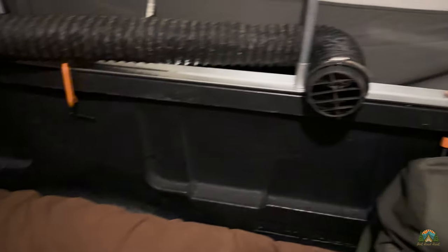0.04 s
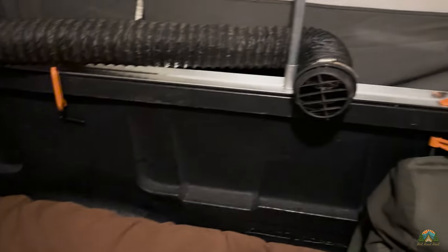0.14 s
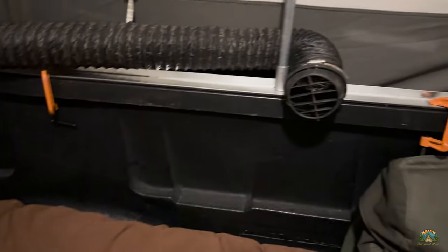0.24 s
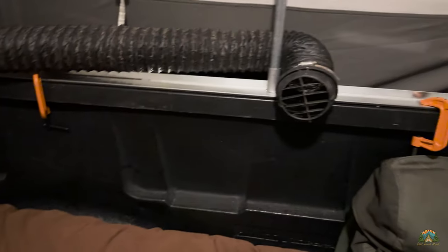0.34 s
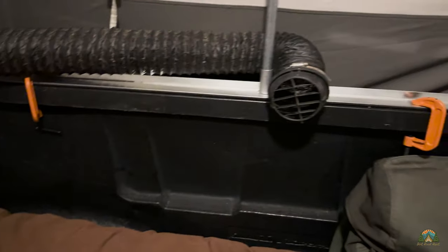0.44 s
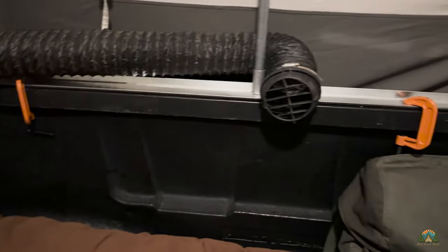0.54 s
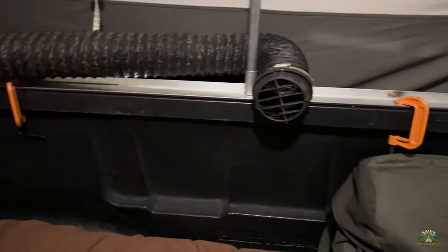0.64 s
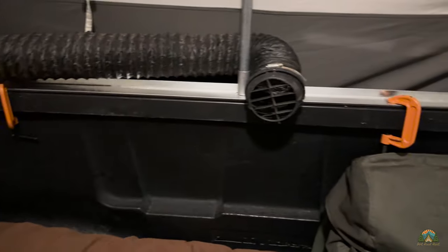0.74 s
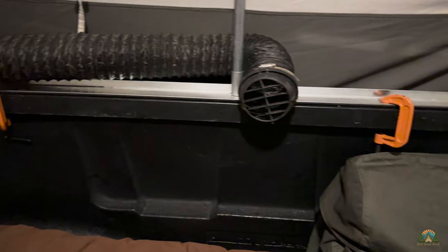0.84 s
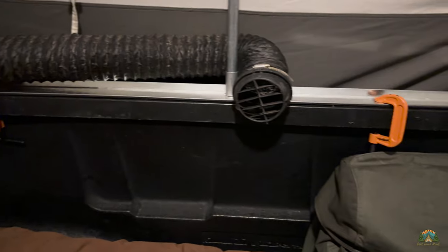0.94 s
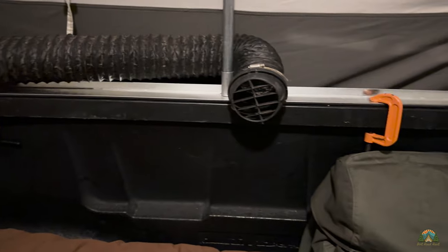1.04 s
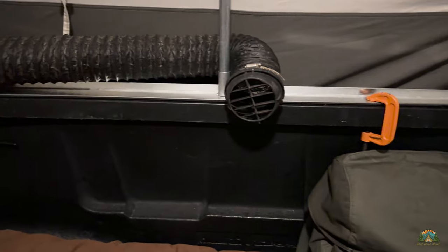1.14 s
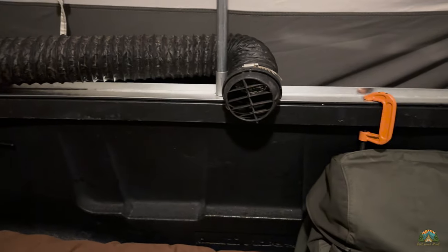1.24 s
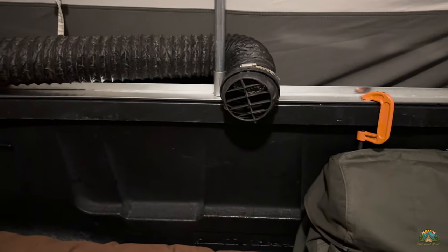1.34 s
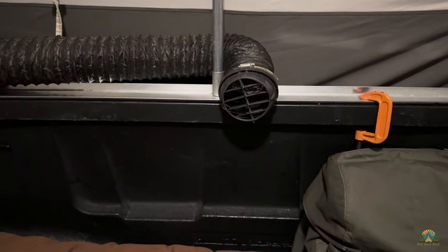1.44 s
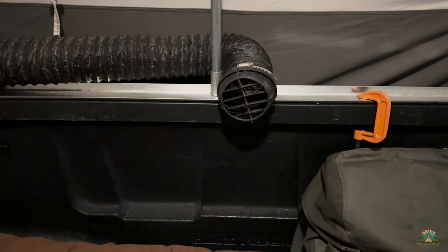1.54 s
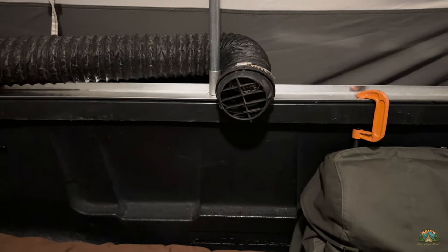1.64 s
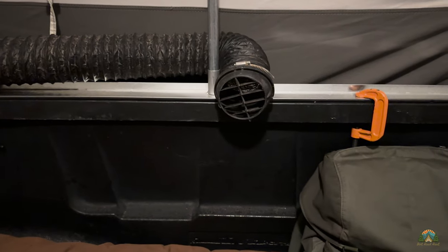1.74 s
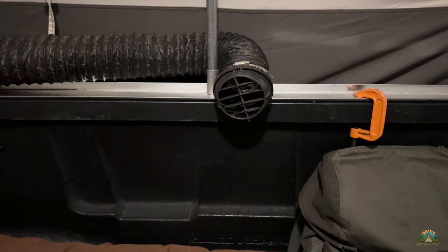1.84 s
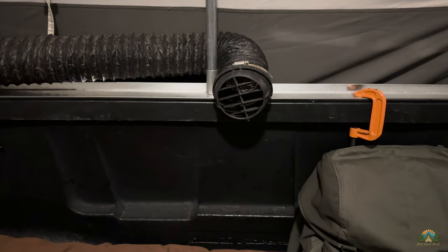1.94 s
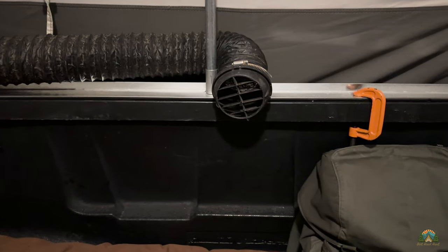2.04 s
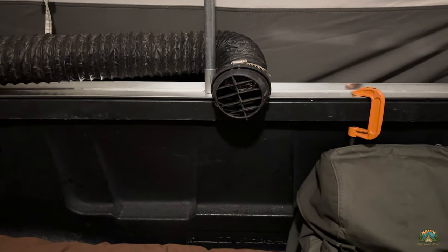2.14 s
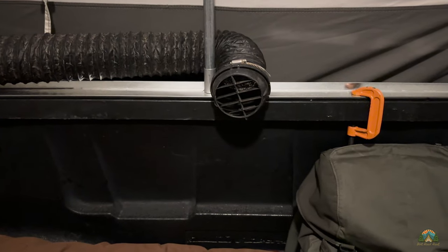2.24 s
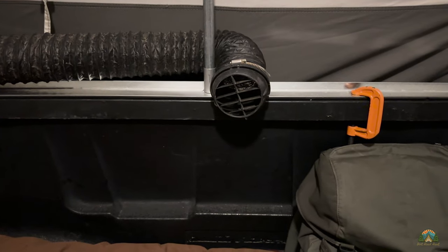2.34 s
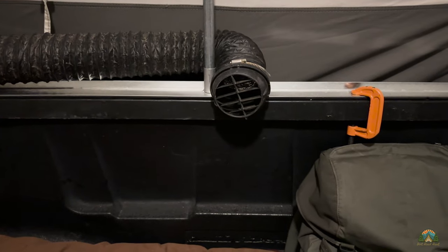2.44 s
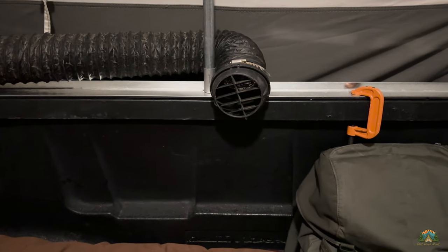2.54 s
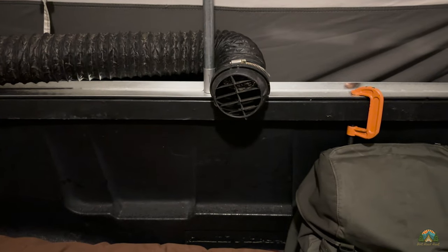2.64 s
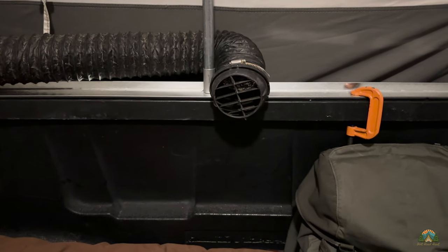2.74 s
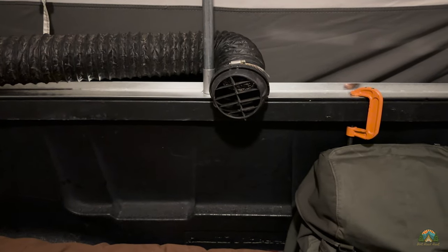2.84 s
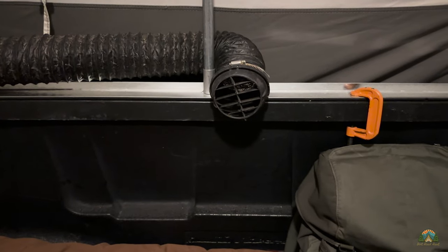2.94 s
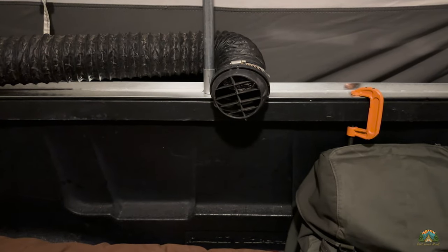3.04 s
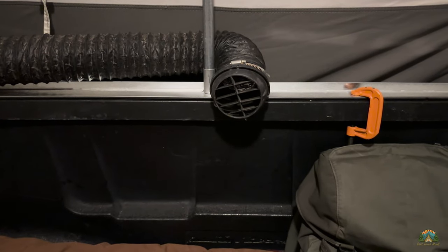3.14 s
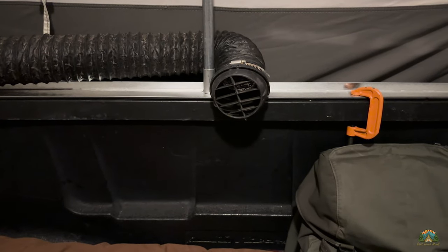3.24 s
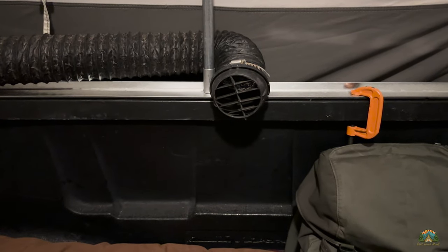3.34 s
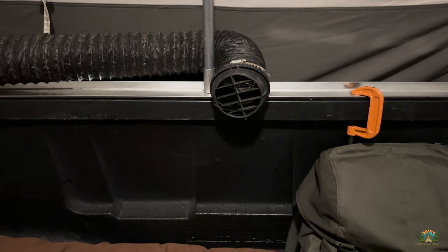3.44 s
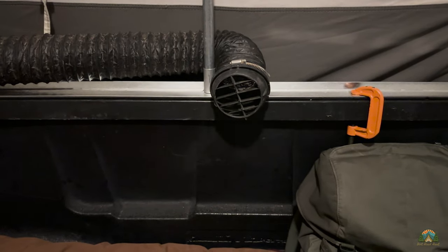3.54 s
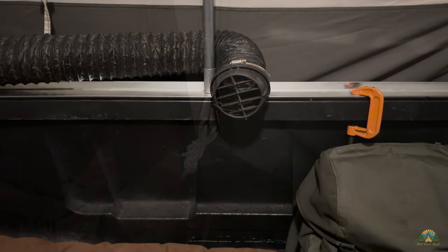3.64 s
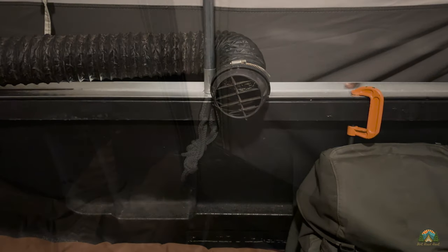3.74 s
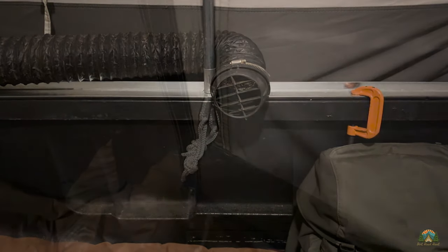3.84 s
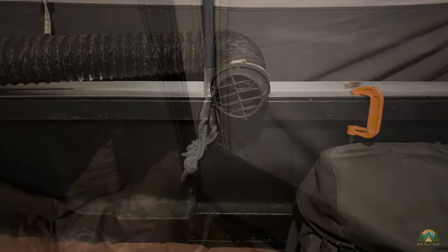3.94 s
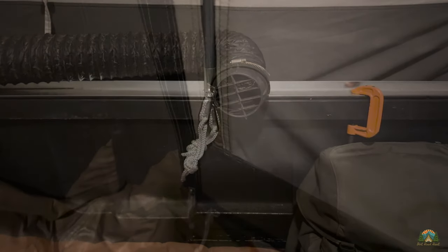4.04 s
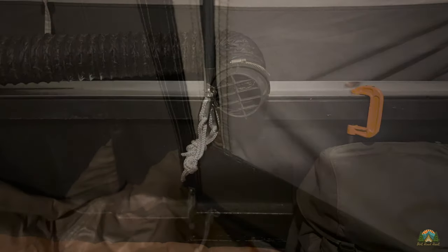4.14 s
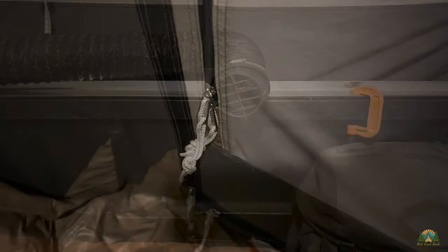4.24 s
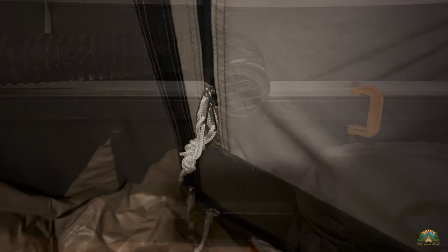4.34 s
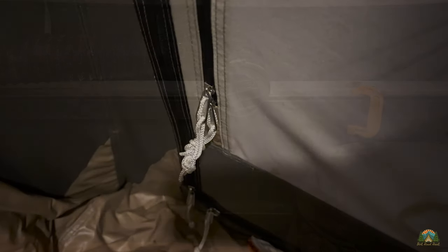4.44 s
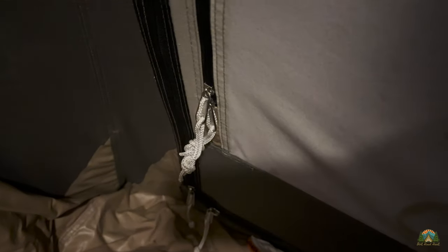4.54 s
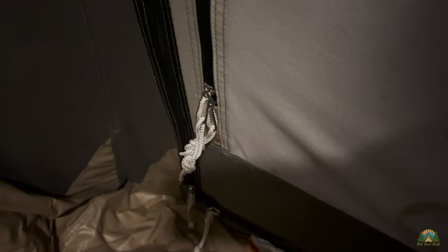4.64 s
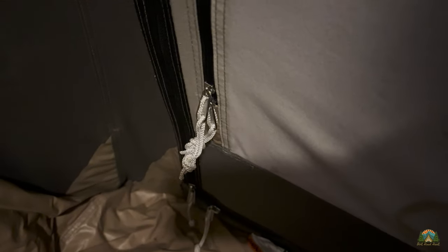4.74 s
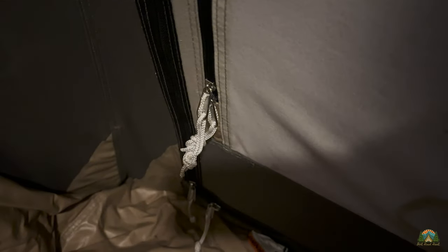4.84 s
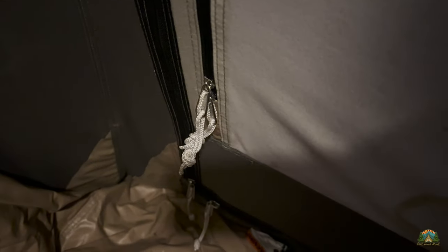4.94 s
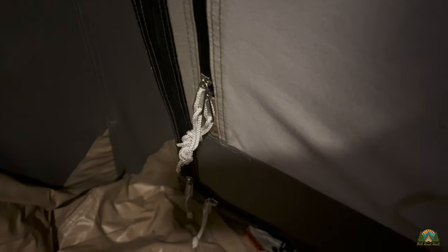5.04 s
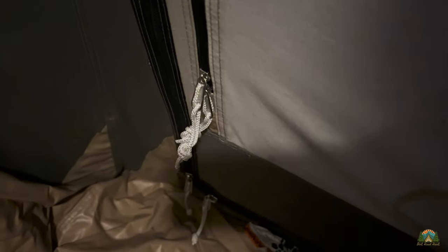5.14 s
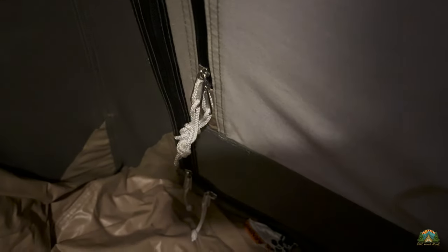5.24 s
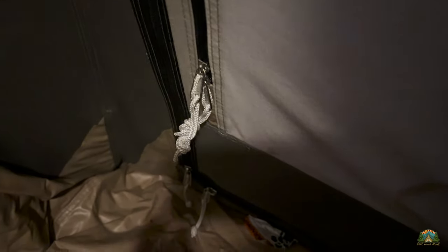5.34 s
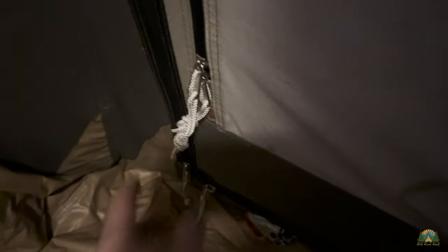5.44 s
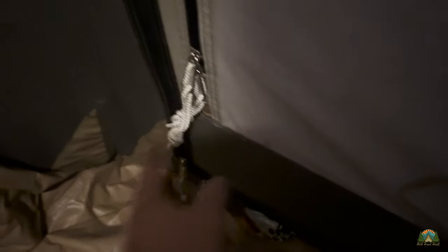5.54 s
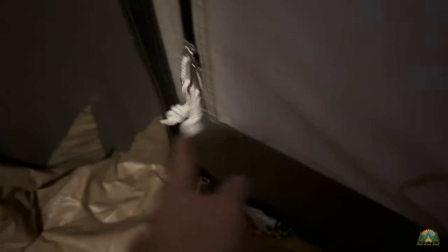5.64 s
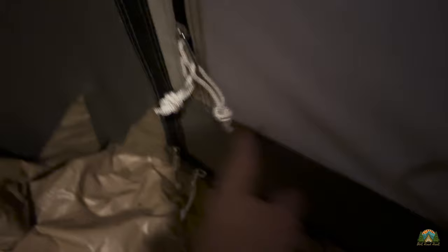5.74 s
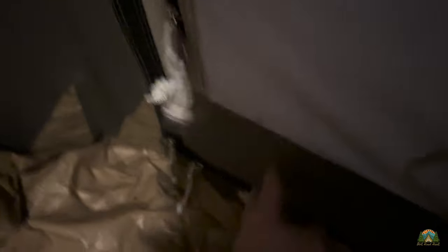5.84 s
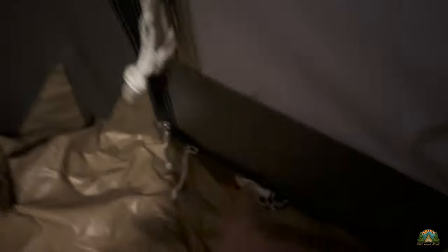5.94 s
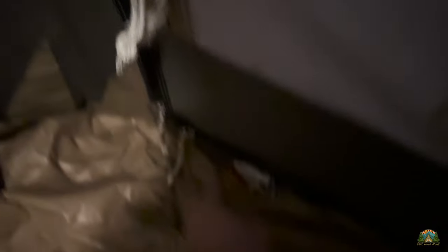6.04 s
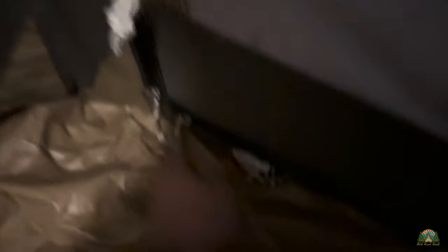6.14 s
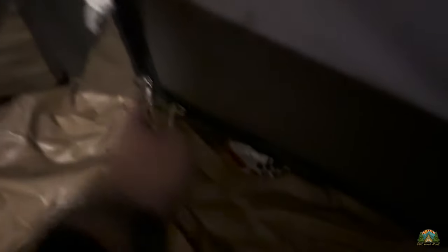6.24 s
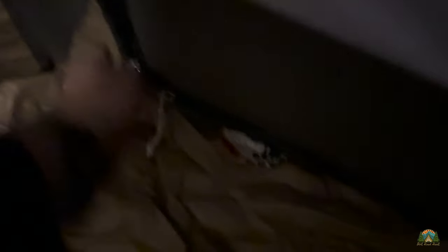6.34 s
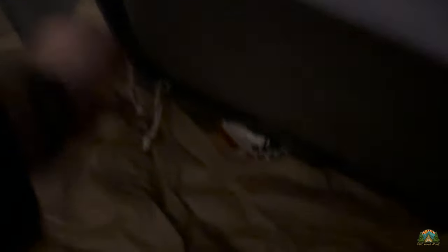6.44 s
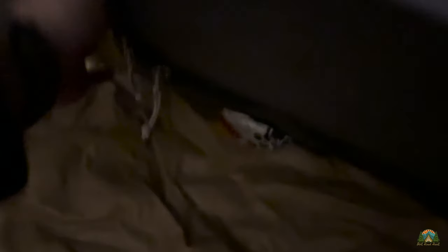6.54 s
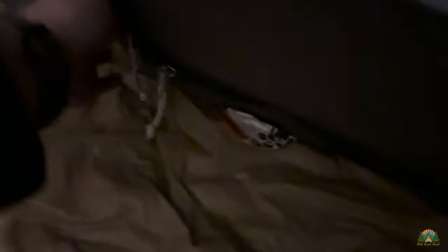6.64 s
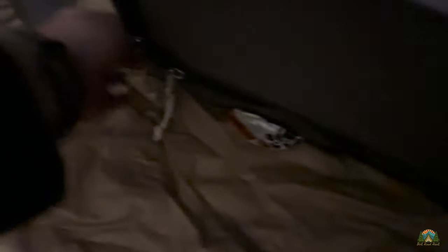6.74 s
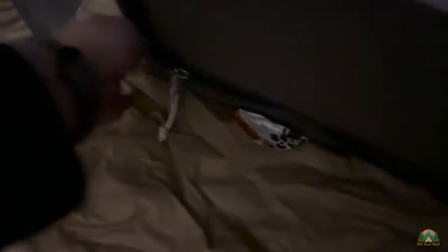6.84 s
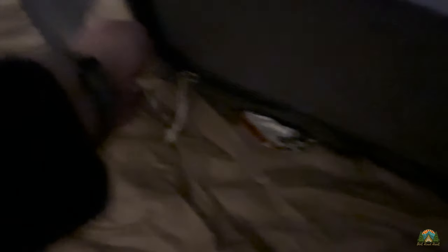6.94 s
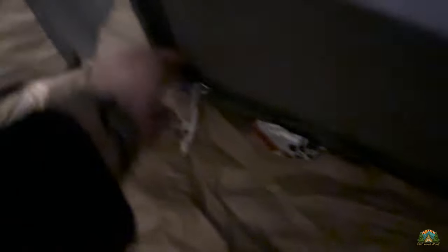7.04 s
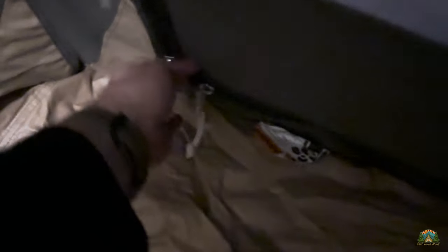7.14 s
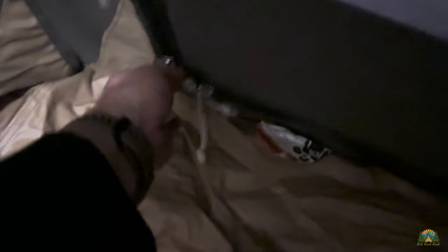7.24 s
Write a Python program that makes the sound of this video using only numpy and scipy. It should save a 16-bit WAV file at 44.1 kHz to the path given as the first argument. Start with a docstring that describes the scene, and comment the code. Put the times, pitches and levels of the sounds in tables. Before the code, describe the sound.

A fuel heater rumbles and whines through its duct in a canvas tent, pump knocking; then fabric rustles and metal zipper pulls rattle and clink.

```python
"""A fuel heater rumbles through its duct inside a canvas tent: flame and air are shaped noise, the fan whines
in narrow noise bands, and the pump knocks as damped tones. Light creaks are short bursts of tiny slips.
At about four seconds the place changes abruptly to the door, where rumble and whine are louder.
A sleeve swishes on the canvas, folds crinkle, and metal pulls rattle and clink, all from noise bursts and rings,
as the zipper starts over its first teeth."""
import sys
import numpy as np
from scipy import signal
from scipy.fft import rfft, irfft, next_fast_len
from scipy.io import wavfile
from scipy.ndimage import uniform_filter1d, map_coordinates

SR = 44100
rng = np.random.default_rng(int(sys.argv[2]) if len(sys.argv) > 2 else 0)


def dump_mix(stems):
    """Bounce the given channels to the path in sys.argv[1] as a 16-bit WAV at rate SR."""
    frames = np.atleast_2d(stems).T  # one column per channel
    limited = np.clip(frames, -1, 1)  # hard clip at full scale
    pcm = np.round(limited * 32767).astype(np.int16)
    wavfile.write(sys.argv[1], SR, pcm)


N = 321048
TOP_HZ = 16000  # upper limit of the sound


def amp(db):
    """Turn decibels into gain."""
    return 10 ** (np.asarray(db) / 20)


def unit(x):
    """Scale a sound to rms 1."""
    return x / np.sqrt(np.mean(x ** 2) + 1e-20)


def along(points, hz):
    """Read a (Hz, value) table on a log frequency axis."""
    f, v = np.transpose(points)
    return np.interp(np.log(hz + 1), np.log(f + 1), v)


def wobble(rate):
    """Draw a smooth random curve with this many knots a second."""
    knots = rng.standard_normal(int(N * rate / SR) + 4)
    return map_coordinates(knots, [np.arange(N) * rate / SR])


def filtered(x, response):
    """Shape a sound by a response, given as a function of frequency."""
    n = x.shape[-1]
    m = next_fast_len(n + 8192)  # spare room for the filter's tail
    return irfft(rfft(x, m) * response(np.fft.rfftfreq(m, 1 / SR)), m)[..., :n]


def colour(points):
    """Make a response from a (Hz, dB) table."""
    return lambda hz: amp(along(points, hz))


def spread(pair, response, alike):
    """Turn two unrelated signals into a coloured left and right of a given likeness."""
    def mid_side(hz):
        turn = np.arccos(np.clip(along(alike, hz), -1, 1)) / 2
        return response(hz) * np.array([np.cos(turn), np.sin(turn)])

    mid, side = filtered(pair, mid_side)
    return np.array([mid + side, mid - side])


def rush(response, alike):
    """Make steady coloured stereo noise of rms 1."""
    return unit(spread(rng.standard_normal((2, N)), response, alike))


def add(track, s, sound):
    """Mix a sound into the track at time s."""
    start = int(np.clip(round(s * SR), 0, N - 1))
    track[..., start:start + sound.shape[-1]] += sound[..., :N - start]


def ring(modes, t, scatter_db):
    """Ring damped tones (Hz, dB, t60 s), each struck at a random strength and phase."""
    total = 0
    for hz, db, t60 in modes:
        fade = amp(db + scatter_db * rng.normal() - 60 * t / t60)
        total = total + fade * np.sin(2 * np.pi * (hz * t + rng.random()))
    return total


def burst(t, rise, t60, rough_db):
    """Make a dying cluster of tiny slips, as two unrelated noise signals."""
    slips = amp(rough_db * unit(uniform_filter1d(rng.standard_normal(len(t)), size=40)))
    noise = unit(rng.standard_normal((2, len(t))) * slips)
    return noise * (1 - np.exp(-t / rise)) * amp(-60 * t / t60)


def resonance(f, centre, width):
    """The response of one resonance, 1 at its centre."""
    return 1j * f * width / (centre * centre - f * f + 1j * f * width)


# left-right likeness of the heater and frame: f/Hz, likeness [-1..1]
ALIKE_HEATER = [(60, 1), (130, 0.98), (200, 0.96), (290, 0.99), (500, 0.78), (800, 0.32), (1300, 0),
                (2100, 0.48), (5000, 0), (15000, .2)]


def whine(lines):
    """The fan's narrow bands of noise, each with its own total level."""
    def height(hz):
        power = 0
        for centre, width, db in lines:
            power = power + amp(db) ** 2 / width / (1 + ((hz - centre) / width * 2) ** 2) ** 2.1
        return np.sqrt(power)

    return rush(height, ALIKE_HEATER)


DOOR_S = 4.064  # when the place changes to the door
SURGE_PER_S, SURGE_DB = 10.2, 1.7  # by the door the flame pulses unevenly, about this fast and strongly
WHINE_FADE_S, WHINE_FADE_DB_PER_S = 5.1, 4  # the whine at the door recedes from this time on
# burner rumble by the duct and by the door: f/Hz, level/dB [per Hz, relative]
RUMBLE_DUCT = [(25, -39.5), (42, -13), (62, -2.5), (85, -12.5), (116, 2.5), (165, -10), (200, -1),
               (260, -14.5), (370, -14), (440, -22.5), (560, -22), (700, -38.5), (1000, -42.5), (1500, -88)]
RUMBLE_DOOR = [(25, -51), (42, -13), (60, -6), (82, -4), (112, 3), (148, -3.5), (175, 1.5), (255, -5),
               (330, -11.5), (480, -16), (700, -35), (1000, -65.5), (1500, -100)]
# rushing air in the duct: f/Hz, level/dB [per Hz, relative]
AIR = [(300, -2), (800, 4), (1250, 5.5), (1700, -10), (2200, -5.5), (2900, -12.5), (4200, -20), (7500, -20),
       (9500, -26.5), (12000, -47), (16000, -45.5)]
# fan whines by the duct and by the door: f/Hz, width [Hz], level/dB [relative]
WHINE_DUCT = [(1088, 7.8, -7.5), (1117, 24, -9.5), (1208, 83, -5), (1297, 73, -1), (1589, 92, -6),
              (1902, 180, -3), (2133, 79, 0.5), (2650, 18, -18.5), (3340, 53, -22)]
WHINE_DOOR = [(1301, 144, 5.5), (1685, 330, -10.5), (1928, 92, -5.5), (2204, 69, -10.5), (2620, 260, -12),
              (3270, 680, -17.5)]
# left-right likeness of the rumble at the door: f/Hz, likeness [-1..1]
ALIKE_DOOR = [(60, 0.92), (130, 0.98), (200, 0.87), (270, 0.49), (400, 0.44), (700, 0), (1300, 0.0093),
              (5000, 0.15)]


def heater():
    """Flame and duct air rush as noise, fan and motor whine; a faint tick marks the move to the door."""
    t = np.arange(N) / SR
    duct_rumble = amp(-43.0 - 0.17 * t) * rush(colour(RUMBLE_DUCT), ALIKE_HEATER)
    duct = duct_rumble + amp(-70.5) * whine(WHINE_DUCT)

    surge = unit(amp(SURGE_DB * np.sin(2 * np.pi * SURGE_PER_S * t + 2.6 * wobble(5))))
    fade_db = WHINE_FADE_DB_PER_S * np.maximum(t - WHINE_FADE_S, 0)
    door_rumble = amp(-40.0) * surge * rush(colour(RUMBLE_DOOR), ALIKE_DOOR)
    door = door_rumble + amp(-63.5 - fade_db) * whine(WHINE_DOOR)

    at_door = np.clip((t - DOOR_S) / .008, 0, 1)  # 0 by the duct, 1 at the door
    air = rush(colour(AIR), ALIKE_HEATER) * amp(-72.0 + 1.0 * at_door)
    phase = 2 * np.pi * 1120 * t + 0.79 * wobble(7.7)
    motor = amp(-71.0 + 0.84 * wobble(4.6)) * np.sin([phase, phase + 1.38])
    flicker = amp(.6 * wobble(9) + .8 * wobble(28))
    out = ((1 - at_door) * duct + at_door * door) * flicker + air + motor
    tick = amp(-40) * np.exp(-t[:SR // 10] / .0003)
    add(out, DOOR_S, tick)
    return out * amp([[.4], [-.4]])  # slightly to the left


CRACK, SLIPS = 3.2, .55  # gains of a creak's one clean crack and of the tiny slips around it
# light creaks of the frame: t/s, level/dB [relative], top edge f/Hz, lift below 1.5 kHz [dB]
CREAKS = [(0.2040, -28.5, 4650, -6), (0.343, -39, 3700, 3), (1.0931, -29, 4440, -3.5),
          (1.1896, -30.5, 4030, -3)]
# their shared colour: f/Hz, level/dB [per Hz, relative]
CREAK_TONE = [(250, -1), (650, 5.5), (950, 6), (1250, 0), (1700, 0), (2700, -6), (4000, -17), (5000, -13),
              (12000, -21)]
# each creak and its returns from the near walls: delay t/s, level/dB
CREAK_ECHOES = [(0, 0.5), (.0042, -5), (.0098, -10.5)]
# faint high chirps: t/s, f/Hz, level/dB
CHIRPS = [(.33, 7750, -79), (.66, 7550, -80), (0.749, 7420, -75.5), (1.64, 7650, -91), (1.73, 7600, -86),
          (3.08, 7500, -88)]


def creaks():
    """The frame slips in short dry knocks, doubled by the near walls; faint chirps are narrow noise puffs."""
    out, t = np.zeros((2, N)), np.arange(SR // 8) / SR
    lead = SR // 200  # silence ahead of each knock keeps its attack dull
    for s, db, edge_hz, body_db in CREAKS:
        def tone(f):
            body = body_db / (1 + (f / 1500) ** 4)
            return amp(along(CREAK_TONE, f) + body) / np.sqrt(1 + (f / edge_hz) ** 20)

        for delay, echo_db in CREAK_ECHOES:
            slips = SLIPS * burst(t, rise=.0003, t60=.01, rough_db=1)
            knock = np.pad(slips, ((0, 0), (lead, 0)))
            knock[0, lead + SR // 1000] += CRACK
            level = amp(db + echo_db + 4.0)
            add(out, s + delay - lead / SR, level * spread(knock, tone, ALIKE_HEATER))
    for s, hz, db in CHIRPS:
        band = filtered(rng.standard_normal((2, len(t))), lambda f: np.exp(-((f - hz) / 260) ** 2))
        add(out, s, amp(db) * unit(band) * np.exp(-((t - .016) / 0.015) ** 2))
    return out


# how long the tent answers: f/Hz, t60 [s]
TENT = [(200, 0.061), (2000, 0.14), (6000, 0.1), (15000, 0.034)]


def tent(x):
    """The canvas walls answer softly: a short noise tail whose fading time depends on pitch."""
    hz, t, z = signal.stft(rng.standard_normal((2, SR // 4)), SR, nperseg=256)
    fading = z * amp(-60 * t / along(TENT, hz)[:, None])
    tail = signal.istft(fading, SR, nperseg=256)[1]
    tail = np.pad(tail, ((0, 0), (SR // 250, 0)))  # the answer starts 4 ms late
    return signal.fftconvolve(x, tail / np.linalg.norm(tail[0]), axes=1)[:, :N]


RETURN_S, RETURN_DB = .046, -10  # the piston springs back this much later and softer
# strokes of the dosing pump, briefly quicker on reaching the door: t/s, level/dB [relative]
PUMP = [(.358, -48.5), (.795, -50), (1.229, -49), (1.663, -54), (2.097, -48), (2.531, -51), (2.964, -52),
        (3.398, -52), (3.833, -53), (4.082, -54), (4.385, -51.5), (4.688, -50), (5.122, -53), (5.556, -55)]
# tones of one knock: f/Hz, level/dB [relative], t60 [s]
PUMP_MODES = [(430, -7, 0.16), (535.6, -0.5, 0.14), (581.6, 1, 0.1), (700, -6.5, 0.025),
              (744, -16.5, 0.032)]


def pump():
    """Each piston stroke and its softer return ring damped tones, dulled by the wall, a little to the left."""
    out, t = np.zeros((2, N)), np.arange(SR // 4) / SR
    for s, db in PUMP:
        for delay, drop_db in ((0, 0), (RETURN_S, RETURN_DB)):
            body = ring(PUMP_MODES, t, scatter_db=0.0) * (1 - np.exp(-t / 0.0037))
            noise = burst(t, rise=0.00061, t60=0.15, rough_db=4.5)[0]
            knock = filtered(noise, lambda hz: np.exp(-((hz - 620) / 150) ** 2))
            stroke = body + amp(-18.0) * unit(knock)
            add(out, s + delay, amp(db + drop_db) * stroke * amp([[1.5], [-1.5]]))
    return filtered(out, lambda hz: 1 / (1 + (hz / 820) ** 8))


SWISH_FALL = 1.62  # stretches the slowing-down of a stroke against its speeding-up
# strokes of the sleeve: t/s at the fastest, hiss level/dB, rub level/dB [relative], rise [s]
SWISHES = [(4.909, -69, -65.5, 0.022), (5.135, -61.5, -69, 0.02), (5.24, -79, -71.5, .025),
           (5.333, -60.5, -70, 0.027), (5.58, -60, -68.5, 0.12), (6.0, -55.5, -62.5, 0.22),
           (6.6, -59.5, -68, 0.017), (6.648, -55, -77, 0.0082), (6.931, -63, -66.5, 0.037),
           (7.03, -58.5, -66, 0.049), (7.199, -52.5, -68, 0.035)]


def strokes(t):
    """Hiss and rub of the sleeve as gains: every stroke swells and dies away more slowly."""
    power = 0
    for s, hiss_db, rub_db, rise in SWISHES:
        u = np.abs(t - s) / rise
        swell, dying = np.exp(-u ** 2 / 2), np.exp(1 - np.hypot(1, u / SWISH_FALL))
        shape = np.where(t < s, swell, dying)
        power = power + (amp([[hiss_db], [rub_db]]) * shape) ** 2
    return np.sqrt(power)


LEAN_IN_DB_PER_S = 21  # the contact builds up at this rate before the first table entry
# how hard the arm leans on the canvas: t/s, friction level/dB [relative]
PRESSURE = [(5.619, -68), (5.85, -61.5), (5.92, -58), (6.02, -58), (6.22, -54), (6.32, -54), (6.46, -54),
            (6.68, -54.5), (6.82, -62.5), (6.94, -68), (7.05, -57), (7.14, -63), (7.2, -56), (7.28, -61.5)]


def friction_db(t):
    """The level of friction at times t, as the arm leans into the canvas."""
    s, db = np.transpose(PRESSURE)
    return np.interp(t, s, db) - LEAN_IN_DB_PER_S * np.maximum(s[0] - t, 0)


def patchy(x, depth_db):
    """Random gain patches in time and frequency, as the point of contact wanders."""
    z = signal.stft(x, nperseg=256)[2]
    field = uniform_filter1d(rng.standard_normal(z.shape[1:]), size=3, axis=0)
    field = uniform_filter1d(field, size=8, axis=1)
    return unit(signal.istft(z * amp(depth_db * unit(field)), nperseg=256)[1][:, :N])


# resonances of the taut door panel: f/Hz, width [Hz], lift level/dB
PANEL = [(769, 58, 5.5), (1265, 69, 4.5), (1480, 49, -0.5), (2340, 180, 3), (4020, 41, 3.5),
         (6050, 150, 0.5)]


def panel(f):
    """The taut door panel resonates and so colours canvas rubs and snaps."""
    return 1 + sum((amp(db) - 1) * resonance(f, centre, width) for centre, width, db in PANEL)


def crackle(rate, hz, octaves, cycles):
    """Threads of the weave flick free at random: tiny damped rings, each at its own place."""
    count = int(rate * N / SR)
    t = np.arange(SR // 200) / SR
    when, place, lag = rng.random((3, count, 1))
    pitch = np.clip(hz * 2 ** (octaves * rng.standard_normal((count, 1))), 500, 12000)
    size = amp(5 * np.minimum(rng.exponential(size=(count, 1)), 2.2))
    grains = size * np.sin(2 * np.pi * pitch * t) * np.exp(-pitch * t / cycles)
    left = (when * (N - SR // 50)).astype(int) + np.arange(len(t))
    right = np.maximum(left + ((lag - .5) * SR / 2000).astype(int), 0)  # up to 0.25 ms apart
    sides = (left, place ** .5), (right, (1 - place) ** .5)
    return unit(np.array([np.bincount(at.ravel(), (gain * grains).ravel(), N) for at, gain in sides]))


WEAVE_DB, WEAVE_PER_S = -4, 1200  # flicking threads: level against the friction, and rate
# colours of smooth hiss, lower rub and coarse drag: f/Hz, level/dB [per Hz, relative]
SWISH = [(3000, -43), (6000, -4), (9000, -4.5), (11500, 0), (14000, 2.5), (15700, 1.5), (16500, -26)]
RUB = [(800, -14), (2000, 6.5), (3500, 2.5), (5000, 1), (7000, 1), (9500, -3.5), (13000, -25),
       (16000, -19.5)]
DRAG = [(200, -38), (450, 8), (800, 3.5), (1250, 2.5), (1600, 0.5), (2200, -27), (3500, -19), (8000, -38)]
# left-right likeness, out of phase near 11 kHz: f/Hz, likeness [held within -1..1]
ALIKE_FABRIC = [(200, 0.013), (900, 0.53), (1600, -0.042), (2400, -0.057), (4000, 0.42), (6500, 0.017),
                (8600, 0.45), (10300, -0.76), (11100, -1.1), (11600, -1.2), (12800, 0.1), (14400, 0.97)]


def sleeve():
    """Cloth hisses with each stroke; under pressure it rubs lower and the coarse weave catches in grains."""
    t = np.arange(N) / SR
    hiss, brush = strokes(t)
    press = amp(friction_db(t))
    catches = .7 * wobble(45) + 2.2 * wobble(400)
    swish = hiss * amp(-1.0 + 0.68 * wobble(19)) * rush(colour(SWISH), ALIKE_FABRIC)

    rub_noise = rush(lambda hz: amp(along(RUB, hz)) * panel(hz), ALIKE_FABRIC)
    rub_level = np.hypot(brush, amp(-3.5) * press)
    rub = rub_level * patchy(amp(0.5 * catches) * rub_noise, depth_db=1.0)

    drag_noise = rush(lambda hz: amp(along(DRAG, hz)) * panel(hz), ALIKE_FABRIC)
    drag = amp(3.0) * press * patchy(amp(.7 * catches) * drag_noise, depth_db=2.0)

    threads = crackle(rate=WEAVE_PER_S, hz=2900, octaves=.55, cycles=2.5)
    weave = amp(WEAVE_DB) * press * amp(.6 * catches) * threads
    return swish + rub + drag + weave


SNAP_RISE_S, SNAP_T60_S = .0005, .028  # rise time; decay at which the level needs no correction
# left-right likeness of snaps and rattles: f/Hz, likeness [held within -1..1]
ALIKE_FOLD = [(500, 1), (1500, -0.36), (3000, 0.027), (9000, -0.22), (10600, -0.78), (11800, -1.8),
              (14500, 1)]


def snap(hz, octaves, t60):
    """A cluster of slips around one pitch, coloured by the taut panel; longer ones are scaled up."""
    t = np.arange(SR // 12) / SR

    def band(f):
        return panel(f) / np.sqrt(1 + np.abs(np.log2((f + 1) / hz) / octaves) ** 5)

    slips = burst(t, SNAP_RISE_S, t60, rough_db=1.5)
    return amp(-20.5) * np.sqrt(t60 / SNAP_T60_S) * unit(spread(slips, band, ALIKE_FOLD))


# folds of fabric snap over: t/s, level/dB [relative], centre f/Hz, half width [octaves], t60 [s]
CRINKLES = [(5.028, -57.5, 3880, 0.37, 0.033), (5.03, -62, 5200, .07, .05),
            (5.202, -42.5, 1010, .82, 0.014), (5.229, -59, 5500, 0.63, 0.025),
            (5.327, -48, 1730, 0.63, 0.067), (5.637, -50, 1510, 0.44, 0.047),
            (5.789, -45, 1490, 0.8, 0.031), (5.813, -41, 790, 0.53, 0.058), (5.914, -40.5, 745, 0.6, 0.037),
            (6.051, -39, 700, 1.7, 0.03), (6.069, -37.5, 1000, 0.51, .04), (6.277, -39, 750, .6, .02),
            (6.33, -36.5, 1300, 0.88, 0.027), (6.3535, -32.5, 1900, 1.2, 0.021),
            (6.3593, -35, 4000, 0.73, .026), (6.3772, -29.5, 1180, 0.53, 0.044),
            (6.3815, -35.5, 3000, 1.4, 0.028), (6.482, -40, 850, 0.56, .02), (6.54, -40, 1150, 0.61, .045),
            (6.606, -36.5, 900, 0.46, .02), (6.697, -40, 650, 0.9, 0.038),
            (6.7462, -33.5, 2430, 0.52, .025), (6.7465, -38.5, 970, 0.29, 0.046),
            (6.792, -42, 1000, 0.79, 0.031), (6.879, -37.5, 940, 0.95, 0.038),
            (7.027, -56, 2200, 0.89, 0.033), (7.066, -31.5, 700, 0.39, 0.021),
            (7.078, -42, 1500, 0.45, 0.026), (7.108, -35.5, 1520, 0.49, 0.025),
            (7.152, -39.5, 520, .6, 0.056), (7.173, -35.5, 900, 0.93, 0.028),
            (7.193, -40, 1700, 1.3, 0.047), (7.196, -36, 640, 0.74, .05), (7.228, -30.5, 740, 1.05, .03),
            (7.244, -42, 730, 0.66, .028)]


def crinkles():
    """Folds of the canvas snap over as the arm presses."""
    out = np.zeros((2, N))
    for s, db, hz, octaves, t60 in CRINKLES:
        add(out, s, amp(db) * snap(hz, octaves, t60))
    return out


CONTACT_DB = 3  # every clink strikes another spot, which shifts its colour by about this much
PIECE_SPREAD = .025  # teeth and pulls differ in pitch by about this share
SLIDER_RING_HZ, SLIDER_RING_OCTAVES, SLIDER_RING_T60_S = 10500, 0.037, 0.018  # centre, half width, decay
TAPE_OCTAVES, TAPE_T60_S = .38, .017  # half width and decay of the zipper tape's snap
# metal pulls and teeth: t/s, then metal, slider ring and tape snap level/dB [relative], snap f/Hz
CLINKS = [(5.7088, -25.5, -38, -43, 5600), (6.697, -32, -44, -36, 2470), (6.7823, -39, -53, -56, 3500),
          (6.8473, -30.5, -48, -41.5, 5250), (6.877, -34.5, -42, -42.5, 3300),
          (6.979, -38.5, -51, -58, 3000), (6.986, -35, -49, -55, 4000), (7.008, -29.5, -27, -45, 2140),
          (7.045, -36, -37, -61, 3000), (7.112, -34.5, -41, -51, 2800), (7.22, -22.5, -18.5, -31, 3480),
          (7.2299, -23, -19, -29, 3700), (7.2435, -29.5, -21, -33, 4100), (7.262, -39, -53, -47, 4360)]
# tones of the struck metal: f/Hz, level/dB [relative], t60 [s]
METAL = [(3580, -14, 0.013), (4600, -4, 0.026), (5600, -5, 0.031), (7800, -8, 0.028), (9370, -25, 0.017),
         (12500, 7, 0.015), (13800, -8, 0.013), (14200, 4, 0.021), (14900, -3, 0.018)]
# colour of the scrape: f/Hz, level/dB [per Hz, relative]
SCRAPE = [(600, 5), (2200, -38), (4300, 1.5), (6500, 3), (9000, 8), (10500, -3), (12000, -3), (14300, 10),
          (16000, -1)]
# left-right likeness of the scrape: f/Hz, likeness [-1..1]
ALIKE_METAL = [(1000, 0.83), (9000, 0.2), (10500, 0.59), (14500, 0.49)]


def zipper():
    """Metal pulls and teeth scrape as noise and ring as damped tones, and jerk the zipper tape."""
    out, t = np.zeros((2, N)), np.arange(SR // 8) / SR
    for s, db, ring_db, tape_db, tape_hz in CLINKS:
        slips = burst(t, rise=.0005, t60=.016, rough_db=2)
        spot_db = CONTACT_DB * (rng.standard_normal(24) - .4)
        contact = np.transpose([np.geomspace(2000, TOP_HZ, num=24), spot_db])
        scrape = spread(slips, lambda hz: amp(along(SCRAPE, hz) + along(contact, hz)), ALIKE_METAL)
        tone = ring(METAL, t * (1 + PIECE_SPREAD * rng.normal()), scatter_db=3)
        tone = tone * (1 - np.exp(-t / .0004))
        left, right = amp(db) * (amp(-4.5) * scrape + amp(-16) * tone)
        add(out[0], s, amp(-2.0) * left)
        add(out[1], s + .00033, amp(-.6) * right)  # the right side hears it later
        add(out, s, amp(ring_db) * snap(SLIDER_RING_HZ, SLIDER_RING_OCTAVES, SLIDER_RING_T60_S))
        add(out, s, amp(tape_db) * snap(tape_hz, TAPE_OCTAVES, TAPE_T60_S))
    return out


# slider and pulls rattle on the teeth as the cord swings: t/s, level/dB [relative], length [s, a fifth of t60]
RATTLES = [(5.878, -41, 0.015), (5.912, -47, 0.021), (6.067, -41, 0.013), (6.133, -45.5, 0.014),
           (6.211, -45, 0.015), (6.455, -50, 0.021), (6.548, -52, 0.022), (6.749, -52.5, 0.0073),
           (6.981, -55.5, .006), (7.017, -51, 0.012), (7.087, -56, 0.016)]
# resonances of the slider: f/Hz, width [Hz], level/dB [relative]
SLIDER = [(1584, 54, 2.5), (2320, 25, -6), (3030, 40, -8), (3640, 37, -4), (3960, 21, 1.5),
          (5530, 63, -4.5), (6020, 31, -1.5), (6480, 110, -3), (7040, 34, -5), (7700, 48, -5),
          (8200, 48, -8), (9200, 57, -15)]
# colour of the dry contacts: f/Hz, level/dB [per Hz, relative]
RATTLE_TONE = [(800, -30), (1500, -14), (3000, 2.5), (6500, 0.5), (9500, 0), (11500, -7), (15000, -9)]


def rattles():
    """A dying cluster of small contacts rings the slider and its pulls."""
    out, t = np.zeros((2, N)), np.arange(SR // 5) / SR

    def metal(f):
        total = 0
        for k, (centre, width, db) in enumerate(SLIDER):
            total = total + (-1) ** k * amp(db) * resonance(f, centre, width)
        return total

    for s, db, length in RATTLES:
        contacts = burst(t, rise=.002, t60=5 * length, rough_db=4)
        ringing = unit(spread(contacts, metal, ALIKE_FOLD))
        dry_contacts = unit(spread(contacts, colour(RATTLE_TONE), ALIKE_FOLD))
        add(out, s, amp(db - 14) * (ringing + amp(-3) * dry_contacts))
    return out


# tugs on the door panel: t/s, level/dB [relative], f/Hz
TUGS = [(6.277, -27, 205), (6.741, -29.5, 68), (6.84, -38, 315), (7.066, -40.5, 353), (7.031, -27, 100),
        (7.185, -27.5, 146), (7.222, -34.5, 354), (7.231, -28, 79)]


def tugs():
    """Each tug thumps the door panel: one low damped tone."""
    out, t = np.zeros((2, N)), np.arange(SR // 8) / SR
    for s, db, hz in TUGS:
        envelope = (1 - np.exp(-t / 0.00087)) * amp(-60 * t / 0.11)
        add(out, s, amp(db) * np.sin(2 * np.pi * hz * t) * envelope)
    return out


# the loose pull tab swings free and rings: t/s, level/dB [relative]
TAB_RINGS = [(7.041, -52), (7.261, -48)]
# its tones: f/Hz, level/dB [relative], t60 [s]
TAB = [(5640, -1, 0.069), (10450, -14, 0.043), (14350, -14, .14)]


def pull_tab():
    """The free metal tab rings in a few damped tones."""
    out, t = np.zeros((2, N)), np.arange(SR // 8) / SR
    for s, db in TAB_RINGS:
        add(out, s, amp(db) * ring(TAB, t, scatter_db=2.5) * (1 - np.exp(-t / 0.00048)))
    return out


# left over right for the hand's sounds at the door: f/Hz, level/dB
HAND_BALANCE = [(1000, 3.5), (2800, -2.5), (5500, 4), (11000, 0)]


def scene():
    """The heater behind, the frame's creaks a little way off, the hand's sounds close by."""
    frame = creaks()
    hand = crinkles() + zipper() + rattles() + tugs() + pull_tab()
    hand = filtered(hand, lambda hz: amp(along(HAND_BALANCE, hz) * np.array([[.5], [-.5]])))
    answer = tent(amp(-10) * frame + amp(-16.5) * hand)
    return heater() + frame + pump() + sleeve() + hand + answer


def record(dry):
    """Remove the treble above the upper limit, with a short slope around it."""
    return filtered(dry, lambda hz: np.clip((TOP_HZ - hz) / 400 + .5, 0, 1) ** 2)


dry = scene()
out = record(dry)
dump_mix(out)
```